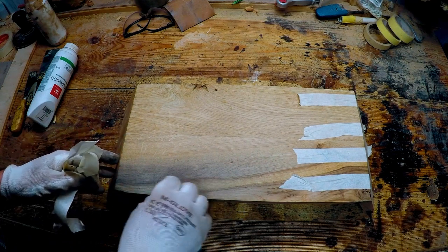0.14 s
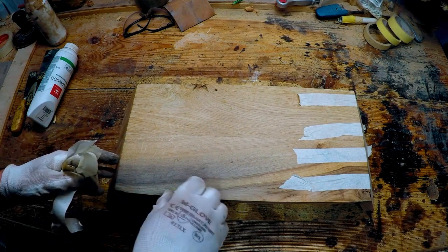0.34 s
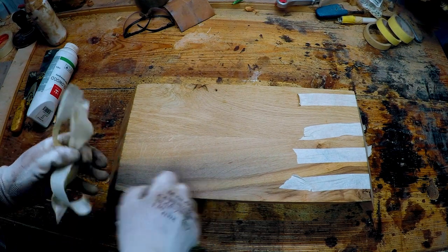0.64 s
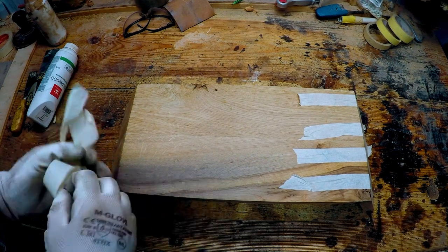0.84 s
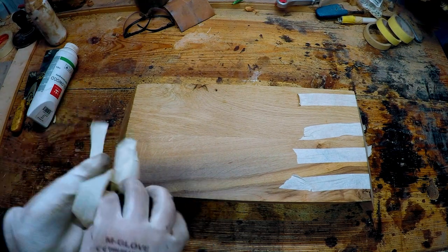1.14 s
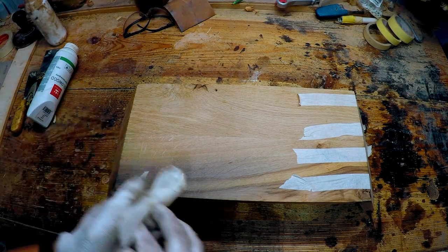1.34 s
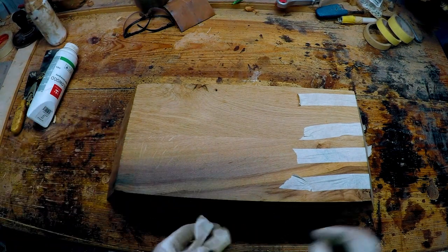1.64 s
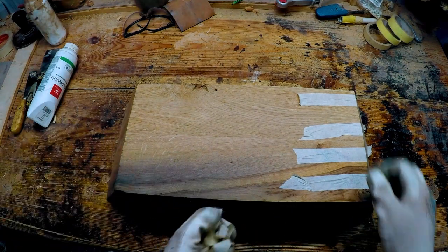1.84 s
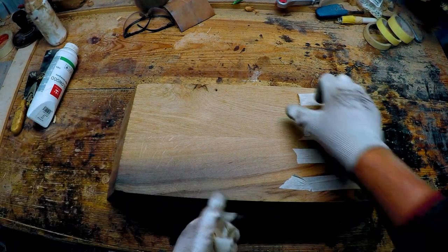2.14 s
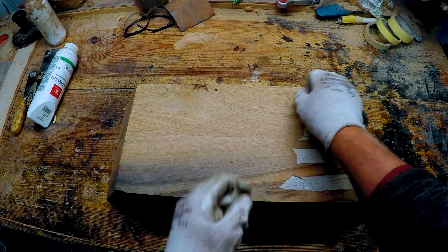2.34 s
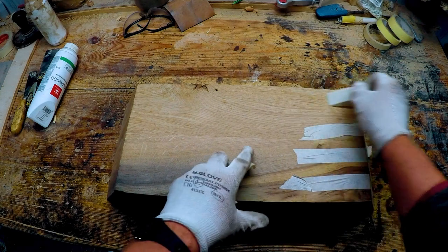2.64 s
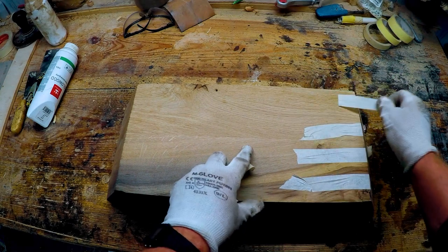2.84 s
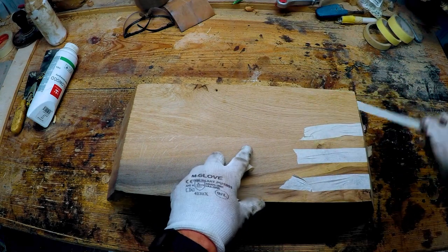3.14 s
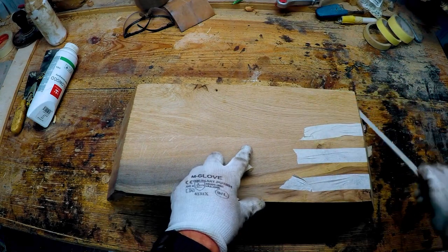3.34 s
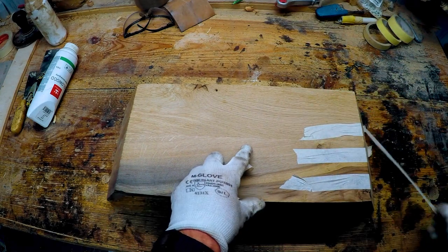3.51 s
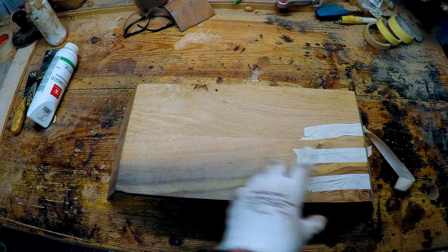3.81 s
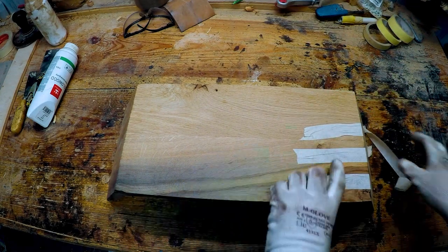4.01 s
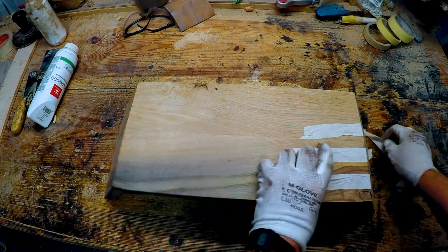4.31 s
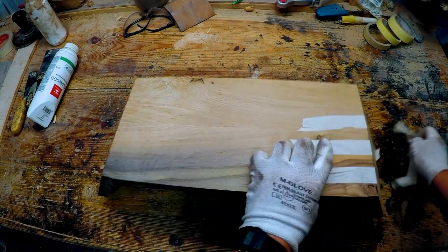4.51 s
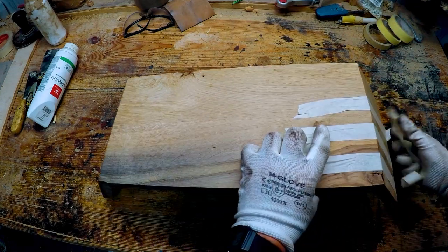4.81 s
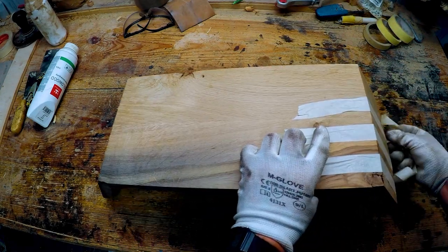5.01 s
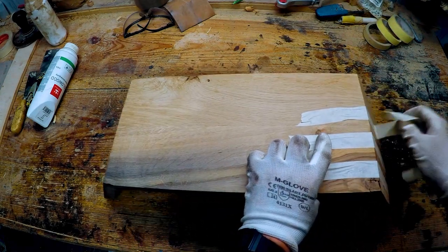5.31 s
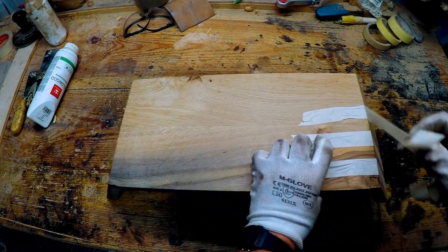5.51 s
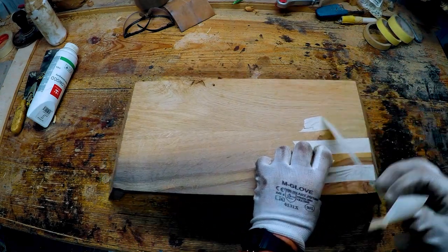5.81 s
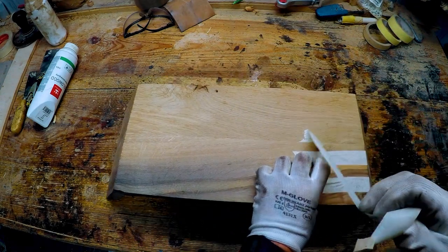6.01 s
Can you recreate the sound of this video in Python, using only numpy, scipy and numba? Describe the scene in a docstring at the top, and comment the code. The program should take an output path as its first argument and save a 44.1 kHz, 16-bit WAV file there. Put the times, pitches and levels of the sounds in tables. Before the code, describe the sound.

Gloved hands crumple masking tape in short papery rustles and crisp snaps, then peel more strips off a wooden board in quick, raspy tugs that buzz faintly in the wood. The board bumps lightly on the bench, gives a sharper clack past the middle, and after more peeling lands with one hard knock. The sounds are close, in a small workshop with a low background rumble.

```python
"""Repeated tugs and crumpling of masking tape, small bumps, then one hard knock: gloved hands peel
tape off a wooden board on a bench, close up. Glue strands let go in swarms of tiny clicks that ring
the paper, while the taut strip drones into the board. Tape creaks, the board hums briefly, creases snap,
gloves rub, and a faint high whistle passes once. A small workshop answers over a low rumble."""
import sys
import numpy as np
from scipy import signal
from scipy.fft import rfft, irfft
from scipy.io import wavfile
from scipy.ndimage import uniform_filter1d
from numba import njit

SR = 44100
rng = np.random.default_rng(int(sys.argv[2]) if len(sys.argv) > 2 else 0)


def to_wav(sig):
    """Store sig (one row per channel, or 1-D mono) as 16-bit WAV at the path in sys.argv[1].

    Samples outside -1..1 are clipped; the rate is SR.
    """
    pcm = np.clip(np.atleast_2d(sig), -1, 1) * 32767
    pcm = np.round(pcm).astype(np.int16)
    wavfile.write(sys.argv[1], SR, pcm.T)  # frames by channels


N = 271656
T = np.arange(N) / SR

# Tape drawn off the wood: end_s, length_s, swell_db, rustle_db (at the end), sizzle_db (re rustle),
# drone_db, drone_hz, rub_db
TAPE_TUGS = [(0.124, 0.042, 6, -48, -9, -44, 395, -45), (0.563, 0.15, -2.5, -64.5, -22, -54, 423, -49.5),
             (2.595, 0.18, 0, -53.5, -7.5, -51, 442, -51), (2.725, 0.12, 2, -47, -3, -37.5, 488, -43),
             (2.77, 0.036, -5, -79, 3, -46.5, 480, -64), (2.883, 0.06, 10, -65, -4, -56, 470, -76),
             (3.002, 0.097, 4.5, -58, 1, -45, 433, -49.5),
             (3.111, 0.088, 5.5, -47.5, 1.5, -42.5, 450, -43.5),
             (3.398, 0.089, 9, -50, 4.5, -47.5, 410, -48.5), (3.503, 0.068, 4.5, -48, 1, -45.5, 470, -51),
             (3.563, 0.016, -4, -50.5, 3.5, -43, 436, -44.5),
             (3.742, 0.012, 3, -56.5, -13, -54.5, 400, -72), (4.218, 0.13, 8, -70, -25, -53.5, 445, -56),
             (4.38, 0.03, -2.5, -58, -2, -42, 424, -39), (4.542, 0.11, -9, -52.5, -9, -55, 465, -68),
             (4.73, 0.0094, 7, -74, 0.5, -59.5, 418, -73), (5.017, 0.023, -12, -69.5, -2, -63, 466, -57),
             (5.33, 0.18, 4.5, -51.5, 6.5, -50, 452, -50.5), (5.413, 0.062, -0.5, -45, 3, -39.5, 417, -57),
             (5.478, 0.043, 6, -50.5, 9.5, -43.5, 467, -48),
             (5.629, 0.078, 0.5, -48, -1.5, -44.5, 470, -43),
             (5.948, 0.13, -10.5, -62.5, 0.5, -58, 447, -55.5), (6.038, 0.045, 4, -54, -2, -53.5, 457, -59)]
# Loose tape squeezed in the gloves: end_s, length_s, swell_db, rustle_db, sizzle_db (re rustle)
TAPE_SQUEEZES = [(0.33, .1, -9, -70, -22), (0.629, 0.037, 9.5, -50.5, 2.5), (0.691, .015, 15, -55, 5),
                 (0.833, 0.037, -10.5, -58.5, -2), (0.985, 0.093, -3.5, -52.5, -8),
                 (1.053, 0.069, -8.5, -55, -8), (1.236, 0.12, 6.5, -49, -6.5), (1.344, 0.073, 9, -44, -1.5),
                 (1.515, 0.043, 1, -42, -3), (1.457, 0.022, 2, -51, -3), (1.651, 0.094, 13, -44.5, -3),
                 (1.792, 0.081, 8, -49.5, -6), (1.858, 0.03, 0.5, -48, 2.5), (2.028, 0.12, -3, -53, -8),
                 (2.165, 0.04, 3.5, -54.5, -7), (2.293, 0.035, -3, -55.5, -16),
                 (2.395, 0.021, -10, -58.5, -5), (3.292, 0.058, -1.5, -61.5, 1),
                 (3.698, 0.1, 0.5, -55.5, -21), (4.144, 0.098, 6, -43.5, -24),
                 (4.295, 0.041, -3.5, -57.5, -6), (4.676, 0.096, 9, -51, 0), (4.83, 0.02, -11, -71, 4),
                 (5.73, 0.074, -6, -60.5, 2.5), (6.15, 0.029, -5.5, -50.5, -3)]
# The wooden board's modes: pitch_hz, level_db, t60_s
BOARD_MODES = [(284, -6.5, 0.19), (380, -8.5, 0.087), (400, 1, 0.12), (470, 1.5, 0.099), (512, -0.5, 0.083),
               (550, -1.5, 0.058), (642, -9, 0.076), (745, -9.5, 0.097), (880, -3, 0.071),
               (1003, -6.5, 0.08), (1160, 1, 0.035), (1980, -12, 0.041), (2330, -22, 0.025),
               (2850, -13, 0.018)]
PAPER_SLOPES_DB_S = 347, 263  # attack, release


def undb(db):
    """Decibels to gain."""
    return 10 ** (np.asarray(db) / 20)


def level(x, db):
    """Scale to an rms level."""
    return x * undb(db) / np.sqrt(np.mean(x ** 2))


def band(x, hz, width):
    """Two-pole band-pass, gain 1 at the centre."""
    return signal.lfilter(*signal.iirpeak(hz, hz / width, SR), x)


def highpass(x, hz):
    """Two-pole high-pass."""
    return signal.sosfilt(signal.butter(2, hz, "high", fs=SR, output="sos"), x)


@njit
def sweep(x, hz, width):
    """State-variable band-pass with a moving centre."""
    out, band_state, low_state = np.empty(len(x)), 0., 0.
    for i in range(len(x)):
        tuning, damping = np.tan(np.pi * hz[i] / SR), width / hz[i]
        passed = (band_state + tuning * (x[i] - low_state)) / (1 + tuning * (tuning + damping))
        band_state = 2 * passed - band_state
        low_state += 2 * tuning * passed
        out[i] = damping * passed
    return out


def ring(x, modes):
    """Damped modes; a unit impulse starts each at its level."""
    out = 0
    for hz, db, t60 in modes:
        pole = np.exp(2j * np.pi * hz / SR - np.log(1000) / (t60 * SR))
        out = out + undb(db) * signal.lfilter([1], [1, -pole], x).imag
    return out


def walk(rate_hz):
    """Smooth random modulation, spread a little under 1."""
    hold = int(SR / rate_hz)
    steps = np.repeat(rng.standard_normal(N // hold + 1), hold)
    return 0.94 * uniform_filter1d(uniform_filter1d(steps, hold), hold)[:N]


def swarm(per_s, spread_db):
    """Clicks at random moments, most small, a few large; rms 1."""
    hits = rng.random(N) < per_s / SR
    return level(hits * rng.standard_normal(N) * undb(spread_db * rng.exponential(size=N)), 0)


def tinted_noise(spectrum, db):
    """Steady noise with a given spectrum and rms level."""
    hz, shape_db = np.transpose(spectrum)
    bins_hz = np.arange(N // 2 + 1) * SR / N + 1
    shape = undb(np.interp(np.log(bins_hz), np.log(hz), shape_db))
    return level(irfft(rfft(rng.standard_normal(N)) * shape, N), db)


def strokes(end_s, length_s, swell_db, db, rise_db_s, fall_db_s):
    """Power of each hand stroke on a millisecond grid: steep attack, steady ramp, steep release."""
    t = np.arange(0, N / SR, .001)[:, None] - end_s
    length_s = np.maximum(length_s, .005)
    attack_db = rise_db_s * np.minimum(t + length_s, 0)
    ramp_db = swell_db * np.clip(t / length_s, -1, 0)
    release_db = -fall_db_s * np.maximum(t, 0)
    return undb(2 * (db + attack_db + ramp_db + release_db))


def envelope(power, rest_db):
    """Gain of all strokes together over a resting level: the hands are never quite still."""
    gain = np.sqrt(power.sum(axis=1) + undb(2 * rest_db))
    return np.interp(T * 1000, np.arange(len(power)), gain)


def room_tone():
    """A gently wavering low rumble under a steady hiss."""
    # Spectrum of the rumble: frequency_hz, density_db (relative)
    rumble_spectrum = [(11, -17), (18, 3.5), (32, 2.5), (48, -4.5), (75, 1), (92, -16), (118, -6),
                       (174, -27), (200, -44), (260, -39), (440, -120)]
    # Spectrum of the hiss: frequency_hz, density_db (relative)
    hiss_spectrum = [(120, -62), (200, 0.5), (394, 0.5), (709, -9.5), (968, -13), (2860, -13), (6050, -18),
                     (8580, -21), (14600, -23), (16000, -41)]
    rumble = tinted_noise(rumble_spectrum, -47.8) * undb(0.36 * walk(4.52))
    return rumble + tinted_noise(hiss_spectrum, -61.5)


def paper_rustle():
    """Glue strands letting go ring the paper and sizzle on top, in every tug and squeeze."""
    # The paper's resonances: centre_hz, width_hz, level_db
    paper_bands = [(830, 730, -7), (1834, 525, 0.5), (2516, 220, -6), (2855, 79, 5.5), (2966, 160, -7.5),
                   (3405, 115, -0.4), (2840, 1920, -2), (4450, 350, -0.5), (4770, 240, 2.5), (5342, 67, 4),
                   (5380, 98, 3.5), (6010, 110, -7.5), (6500, 62, -0.5), (5450, 1560, -0.5),
                   (7570, 1300, -9.5)]
    moves = np.vstack([TAPE_SQUEEZES, np.array(TAPE_TUGS)[:, :5]])
    end_s, length_s, swell_db, rustle_db, sizzle_db = moves.T
    body = strokes(end_s, length_s, swell_db, rustle_db, *PAPER_SLOPES_DB_S)
    top = strokes(end_s, length_s, swell_db, rustle_db + sizzle_db, rise_db_s=800, fall_db_s=550)
    strands = swarm(6000, 0.9) * undb(walk(60))
    # the bent paper keeps changing shape, so each resonance flickers on its own
    paper = sum((-1) ** k * undb(db + 2.73 * walk(30)) * band(strands, hz, width)
                for k, (hz, width, db) in enumerate(paper_bands))
    fine_clicks = swarm(20000, .3) * undb(1.5 * walk(24.64))
    sizzle = band(highpass(fine_clicks, 3400), 5100, 11600)
    glints = sum(undb(4 * walk(8)) * band(sizzle, hz, width=90) for hz in rng.uniform(6500, 15000, 20))
    sizzle = level(sizzle, 0) + level(glints, -5)
    return envelope(body, -68.5) * level(paper, 0.14) + envelope(top, -90) * level(sizzle, -7.5)


def peel_drone():
    """Glue grips and slips at the peel line, droning in the taut strip and the board."""
    end_s, length_s, swell_db, _, _, drone_db, tug_hz, _ = np.transpose(TAPE_TUGS)
    hang_s, slack_hz = 0.0054, 411
    taut = strokes(end_s + hang_s, length_s + hang_s, 0.17 * swell_db, drone_db,
                   rise_db_s=598, fall_db_s=600)
    # squeezes near the board wake it a little
    slack = strokes(*np.transpose(TAPE_SQUEEZES)[:4], *PAPER_SLOPES_DB_S) * undb(-9) ** 2
    gain = envelope(np.hstack([taut, slack]), rest_db=-83)
    # the strongest tug sets the wavering note
    bend_hz = np.interp(T * 1000, np.arange(len(taut)), taut @ (tug_hz - slack_hz)) / gain ** 2
    hz = (slack_hz + bend_hz) * (1 + 0.053 * walk(19))
    slips = swarm(4000, 1) * undb(1.3 * walk(30))
    strip = sweep(sweep(slips, hz, 85.0), hz, 85.0)
    # the strip feeds the board mostly what lies near its own note
    board = ring(sweep(slips, hz, 120.0) + 0.06 * sweep(slips, hz, 630.0), BOARD_MODES)
    return gain * (level(strip, -2.5) + level(board, -4))


def glove_rub():
    """Gloves rub the wood with each tug: a low, uneven scuff."""
    end_s, length_s, *_, rub_db = np.transpose(TAPE_TUGS)
    scuff = band(band(rng.standard_normal(N), 117, 230), 115, 120) * undb(5.9 * walk(25))
    hands = strokes(end_s, length_s, 0, rub_db, rise_db_s=215, fall_db_s=143)
    return envelope(hands, rest_db=-64.5) * level(scuff, -2.36)


def creaks_and_board_drones():
    """Tape creaks and brief low drones of the board: dense clicks, each through one narrow resonance."""
    # Tape creaks and low board drones: end_s, length_s, swell_db, level_db, pitch_hz, width_hz
    resonances = [(.15, .09, 0, -75, 1900, 150), (2.23, 0.18, 0, -64, 1710, 260),
                  (3.51, 0.057, -7, -57, 727, 150), (5.423, 0.077, 0, -48, 284, 60),
                  (1.0, 0.204, 3, -63, 343, 80), (1.497, 0.021, -3, -49, 1230, 400),
                  (4.029, 0.013, -5, -57, 1710, 250), (4.113, 0.032, 3, -47.5, 1900, 300),
                  (4.125, 0.043, 6, -44, 5200, 600), (4.16, 0.017, -5, -50, 1680, 250),
                  (5.168, 0.01, 0, -52.5, 2480, 500), (5.256, 0.027, -1, -47, 2920, 900),
                  (5.252, 0.064, 5, -47, 5800, 1500)]
    clicks = swarm(5000, 0.49)
    out = np.zeros(N)
    for end_s, length_s, swell_db, db, hz, width in resonances:
        power = strokes(end_s, length_s, swell_db, db, rise_db_s=1800, fall_db_s=700)
        note = band(band(clicks, hz, width), hz, width)
        out += envelope(power, rest_db=-120) * level(note, 0)
    return out


def board_knocks():
    """A smooth push, longer for softer contact, rings board and bench; lying flat muffles the board."""
    # Board against bench: start_s, level_db, contact_ms, favoured_hz, free_ring_ms,
    # bench_db, chatter_db (both re level)
    knocks = [(0.129, -36.5, 1.4, 414, 17, -4, -17), (1.4379, -35.5, 0.51, 840, 6.7, -20, -16),
              (1.487, -38.5, 0.33, 1160, 14, -23, -20), (2.515, -41.5, 3.2, 400, 36, 11.5, -25.5),
              (2.995, -50.5, 0.93, 400, 26, 16.5, -29), (3.324, -44, 0.42, 557, 25, -4, -28),
              (3.553, -28, 0.75, 600, 16, -12, -18), (4.329, -56, 0.92, 400, 34, -7, -19),
              (4.4194, -19.5, 1.28, 470, 20, -20, -25), (4.4233, -16.5, 1.24, 470, 18.3, -44, -40),
              (5.757, -45, 9.6, 400, 30.5, 17, -23), (6.058, -0.5, 0.31, 550, 13.5, -30, -22),
              (6.0591, 3.5, 0.73, 400, 13, -12.5, -22.5), (6.0788, -9.5, 0.53, 290, 4.1, -25, -26),
              (6.097, -22.5, 1.5, 400, 22, -27, -5.5), (6.1375, -19, 0.99, 550, 26, -29, -12.5)]
    # The bench's modes: pitch_hz, level_db, t60_s
    bench_modes = [(62, -2, 0.24), (118, 1.5, 0.17), (162, -8, 0.17), (197, -4, 0.14), (242, -9, 0.1)]
    t = np.arange(16384) / SR
    out = np.zeros(N + len(t))
    for start_s, db, contact_ms, favoured_hz, free_ms, bench_db, chatter_db in knocks:
        push = t * np.exp(-4000 * t / contact_ms)
        push /= push.sum()
        modes = [(hz, mode_db - min(45 * abs(np.log2(hz / favoured_hz)), 12.5), t60)
                 for hz, mode_db, t60 in BOARD_MODES]
        # modes below the favoured one start in the opposite direction
        board = ring(push, [mode for mode in modes if mode[0] >= favoured_hz])
        board -= ring(push, [mode for mode in modes if mode[0] < favoured_hz])
        muffle = undb(-16 / (1 + np.exp(-(t - free_ms / 1000) / 0.00015)))
        # loose edges and things on the bench chatter after the blow, the treble dying first
        noise = rng.standard_normal(len(t))
        low, high = (band(band(noise, hz, 0.56 * hz), hz, 0.55 * hz) for hz in (700, 2500))
        chatter = 5.1 * low * np.exp(-t / 0.039) + 1.6 * high * np.exp(-t / 0.012)
        knock = muffle * board + undb(bench_db) * ring(push, bench_modes) + undb(chatter_db) * chatter
        out[int(start_s * SR):][:len(t)] += undb(db) * knock
    return out[:N]


def crease_snaps():
    """A crease gives way in a burst of coloured noise, led by a short bright tick."""
    # Snapping creases: start_s, strength_db, centre_hz, edge_db (re body)
    snaps = [(0.2232, -49, 3160, -24), (0.622, -42, 2650, -27), (0.6848, -45, 2510, -27),
             (0.7814, -38, 4820, -12), (0.7997, -38, 2640, -25), (0.8376, -33, 4800, -8.5),
             (0.8866, -31, 4870, -7), (0.9105, -33, 4970, -10), (0.9597, -32, 4930, -13),
             (0.9751, -25.5, 2660, -6), (1.047, -37, 5530, -24), (1.142, -40, 2570, -23),
             (1.291, -46, 4300, -21), (1.3116, -42, 4220, -22), (1.3363, -27.5, 4530, -7),
             (1.405, -37.5, 1500, -20), (1.448, -44, 2950, -22), (1.478, -26, 2480, -8),
             (1.541, -34.5, 4500, -12), (1.6278, -32, 5110, -18), (1.744, -37.5, 3040, -11),
             (1.8356, -28.5, 5600, -26), (2.143, -52, 2430, -14), (2.3646, -29.5, 4470, -5),
             (2.515, -38, 2800, -22), (3.0824, -31, 2730, -18), (3.326, -45, 2560, -24),
             (3.5522, -27, 3040, -38), (4.013, -35, 1780, -8), (4.026, -37, 4930, -28),
             (4.05, -46, 1770, -28), (4.2432, -42, 2300, -3), (4.344, -55, 2600, -19),
             (4.376, -37, 5260, -25), (4.4179, -13.5, 2130, -14), (4.4188, -12, 4670, -16),
             (4.4214, -13.5, 6160, -8), (4.4257, -14, 6400, 0.5), (4.52, -33, 5900, -29),
             (4.6436, -38, 2900, -19), (4.7219, -35.5, 2760, -35), (5.015, -40.5, 4170, -15),
             (5.139, -44, 5540, -19), (5.3338, -34, 5600, -21), (5.4734, -37, 3630, -12),
             (5.506, -49, 4000, -8), (5.545, -35.5, 2850, -20.5), (5.819, -47, 5230, -19),
             (6.109, -33, 1620, -22)]
    t = np.arange(4096) / SR
    out = np.zeros(N + len(t))
    tick = np.exp(-t / .001)
    for start_s, db, hz, edge_db in snaps:
        hardness_db = db + 35  # harder snaps start faster and die sooner
        rise_s = .001 * undb(-hardness_db / 2)
        decay_s = max(11 - .25 * hardness_db, 1) / 1000
        burst = np.exp(-t / decay_s) * (1 - np.exp(-t / rise_s))
        noise = rng.standard_normal(len(t))
        noise[0] += 5  # the fold gives with one hard click
        colour = band(band(noise, hz, 0.36 * hz), hz, 0.36 * hz)
        broad = band(band(noise, 2300, 6600), 3670, 6500)
        body = (colour + 0.6 * broad) * (burst + .9 * tick)
        edge = band(highpass(noise, 8300), 8600, 7000) * (.3 * burst + tick)
        snap = body / np.abs(body).max() + undb(edge_db) * edge / np.abs(edge).max()
        out[int(start_s * SR):][:len(t)] += undb(db - 3) * snap
    return out[:N]


def thin_whistle():
    """A faint, very high sine wavers up and back down."""
    # The whistle's path: time_s, pitch_hz, level_db
    glide = [(2.05, 10800, -71), (2.075, 11400, -71), (2.118, 12620, -65), (2.18, 12920, -62),
             (2.197, 13220, -61), (2.235, 12000, -66), (2.265, 10000, -72)]
    time_s, hz, db = np.transpose(glide)
    fade = np.clip(np.minimum(T - time_s[0], time_s[-1] - T) / .01, 0, 1)
    pitch = np.interp(T, time_s, hz) * (1 + 0.0015 * walk(160))
    tone = np.sqrt(2) * np.sin(2 * np.pi * np.cumsum(pitch) / SR)
    return fade * undb(np.interp(T, time_s, db)) * tone


@njit
def wall_reflections(x, lags, gain, damping):
    """Sound bounces between walls: eight delay lines feed each other, duller on every round."""
    lines, dulled, out = np.zeros((8, 4096)), np.zeros(8), np.zeros(len(x))
    for i in range(len(x)):
        total = 0.
        for k in range(8):
            dulled[k] += (1 - damping) * (gain[k] * lines[k, (i - lags[k]) & 4095] - dulled[k])
            total += dulled[k]
            out[i] += dulled[k] * (1 - 2 * (k % 2))
        for k in range(8):
            lines[k, i & 4095] = x[i] + dulled[k] - total / 4
    return out


def scene():
    """Close-up tape and wood, the small workshop's short answer and its room tone, in mono."""
    near = paper_rustle() + peel_drone() + glove_rub() + creaks_and_board_drones()
    near += board_knocks() + crease_snaps() + thin_whistle()
    lags, t60_s = rng.integers(300, 1600, 8), 0.14
    room = wall_reflections(near + 1e-18, lags, undb(-60 * lags / SR / t60_s), damping=0.32)
    return (near + undb(-15.5) * room + room_tone())[None]


def record(dry):
    """A small camera rounds the loudest peak and cuts the top."""
    lowpass = signal.ellip(10, .2, 60, 15400, fs=SR, output="sos")
    return signal.sosfilt(lowpass, 0.88 * np.tanh(dry / 0.99))


dry = scene()
out = record(dry)
to_wav(out)
```